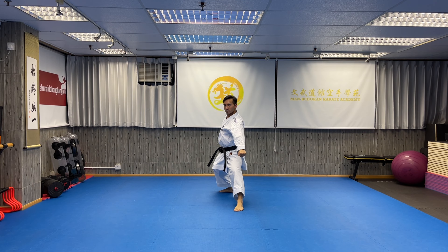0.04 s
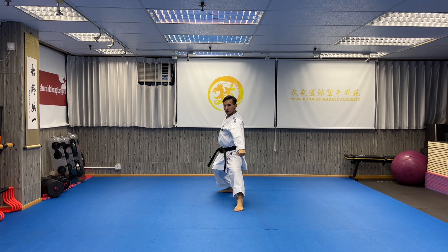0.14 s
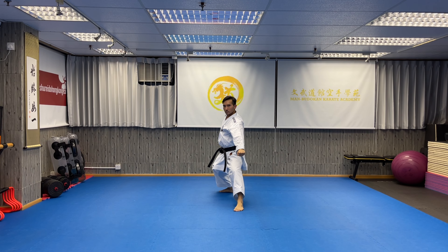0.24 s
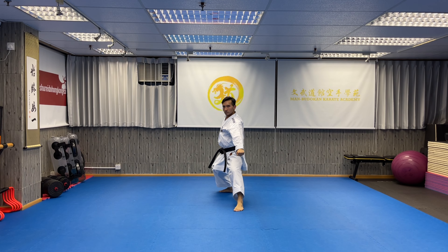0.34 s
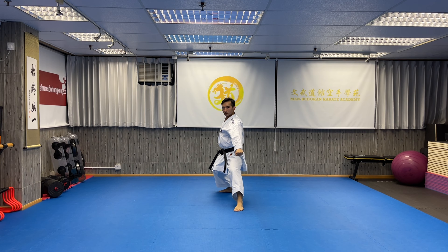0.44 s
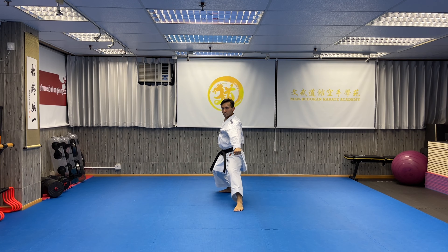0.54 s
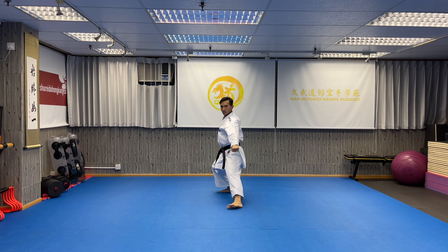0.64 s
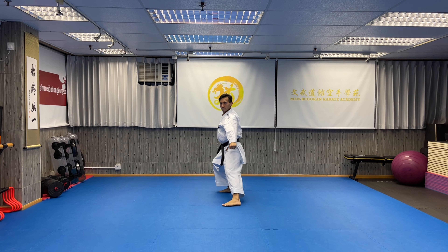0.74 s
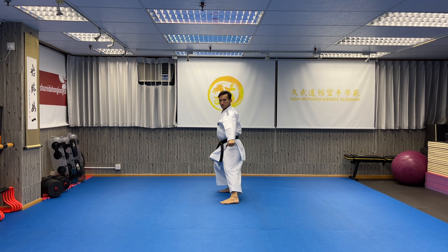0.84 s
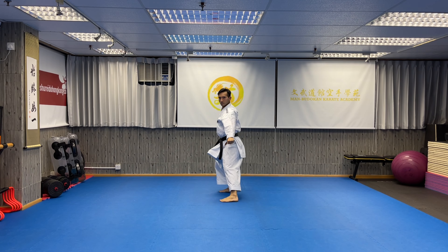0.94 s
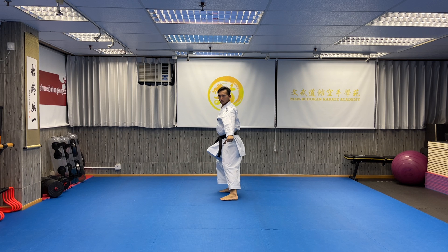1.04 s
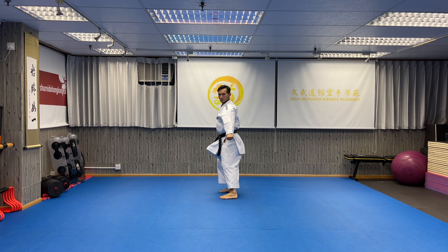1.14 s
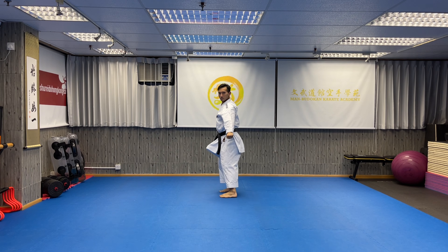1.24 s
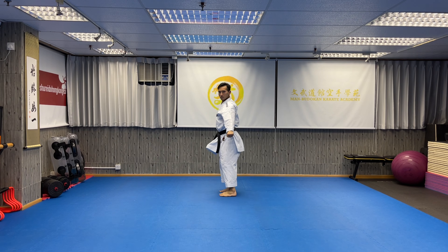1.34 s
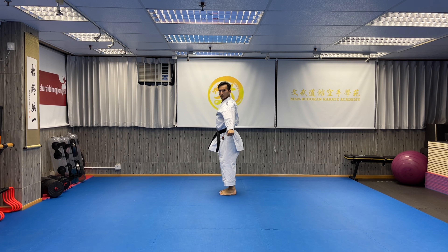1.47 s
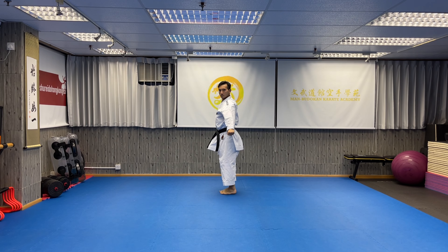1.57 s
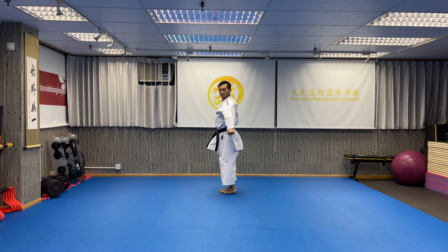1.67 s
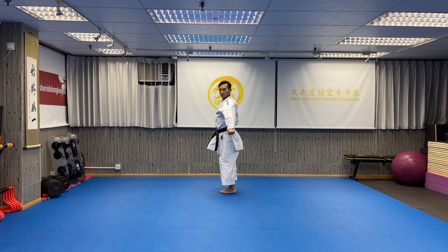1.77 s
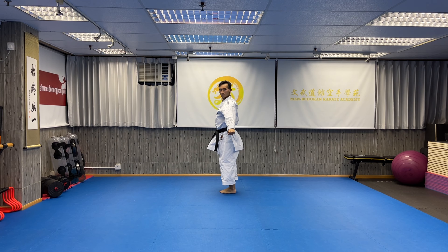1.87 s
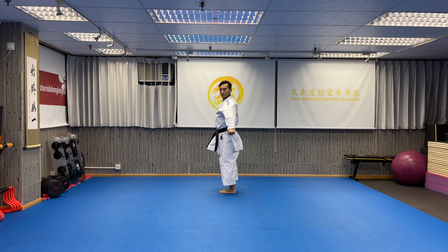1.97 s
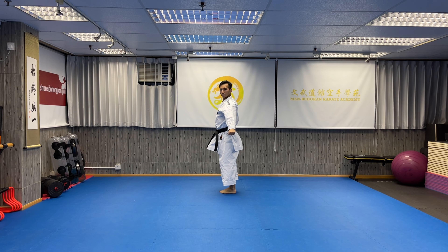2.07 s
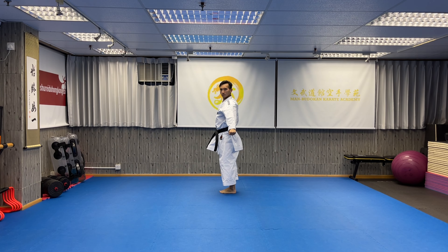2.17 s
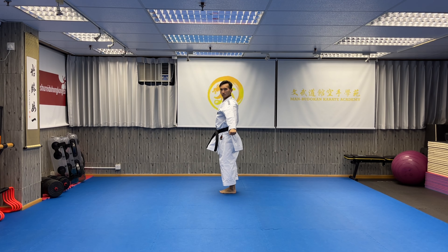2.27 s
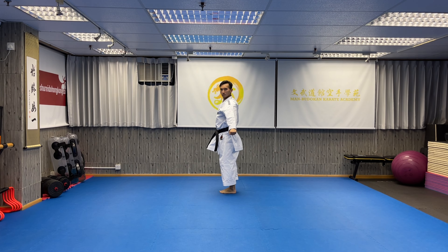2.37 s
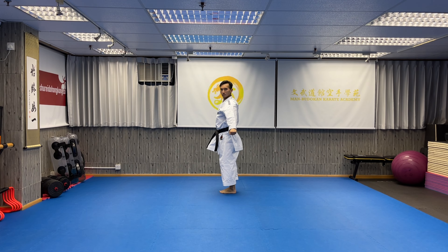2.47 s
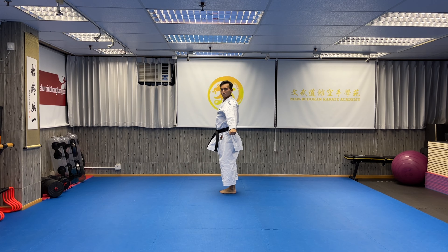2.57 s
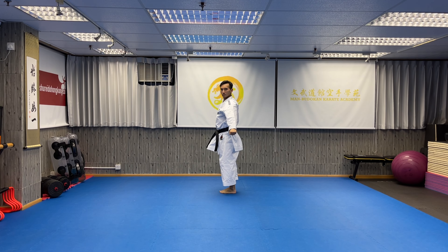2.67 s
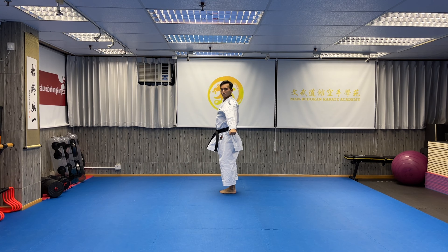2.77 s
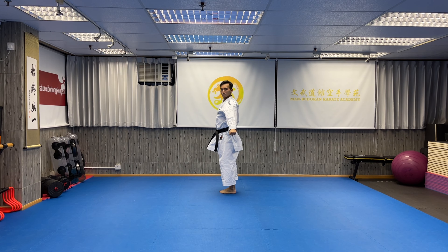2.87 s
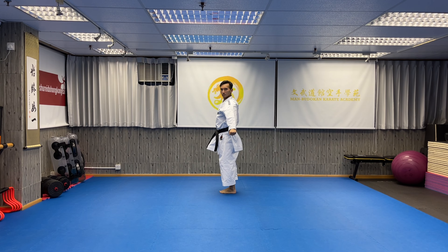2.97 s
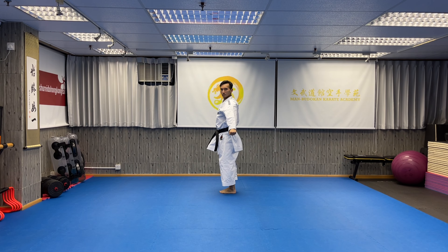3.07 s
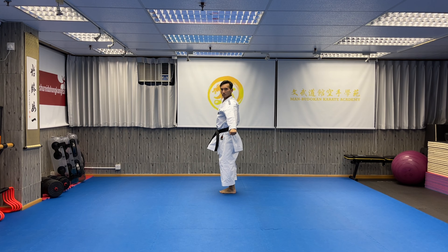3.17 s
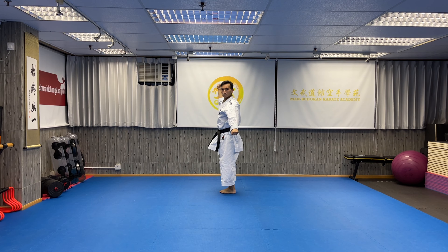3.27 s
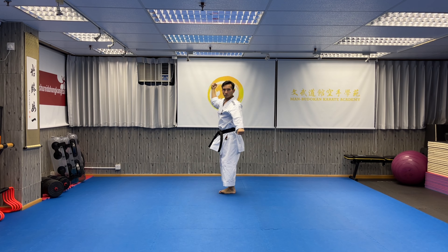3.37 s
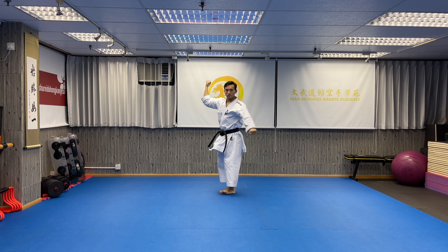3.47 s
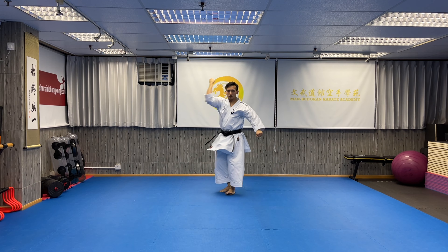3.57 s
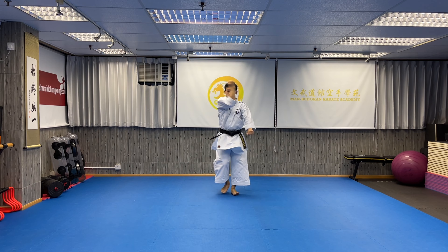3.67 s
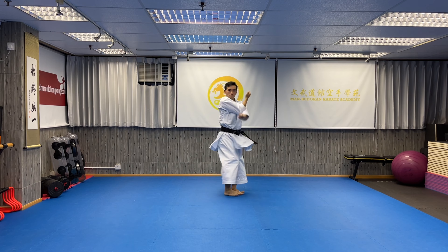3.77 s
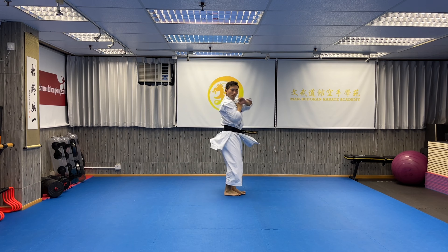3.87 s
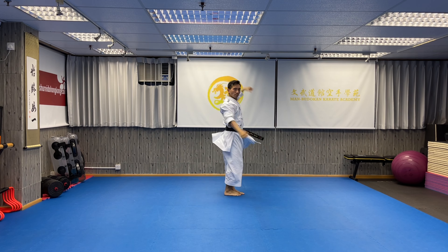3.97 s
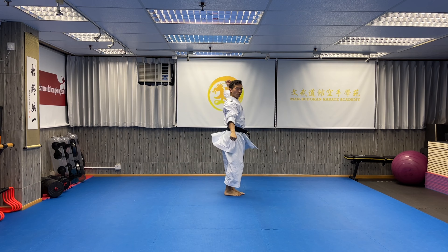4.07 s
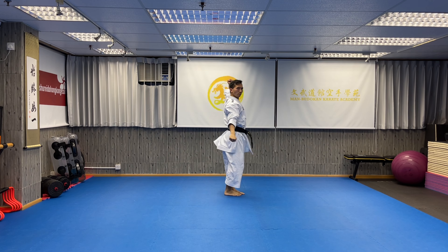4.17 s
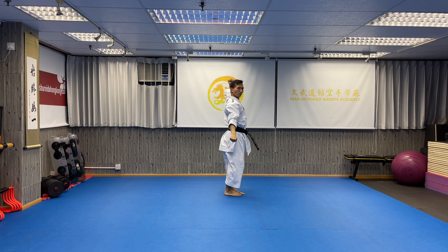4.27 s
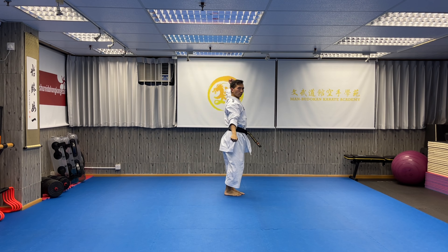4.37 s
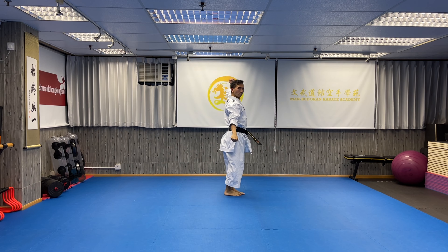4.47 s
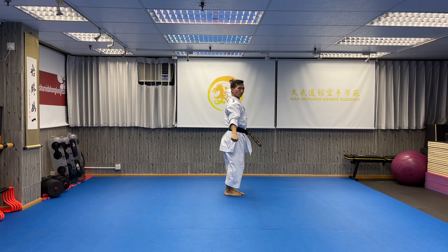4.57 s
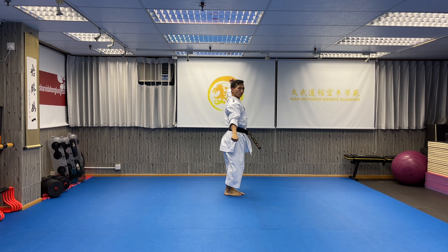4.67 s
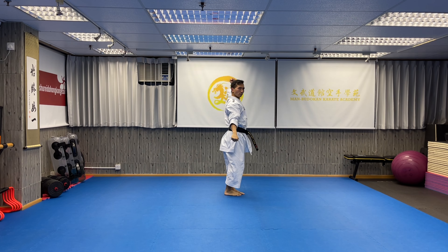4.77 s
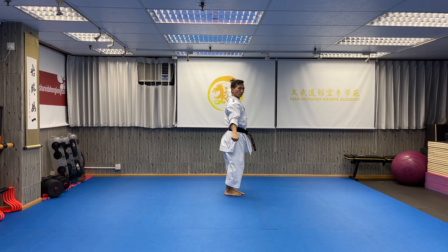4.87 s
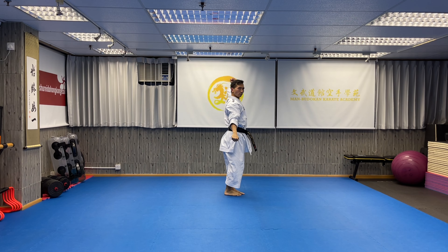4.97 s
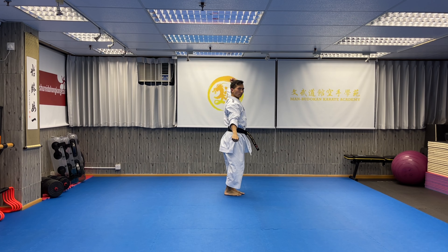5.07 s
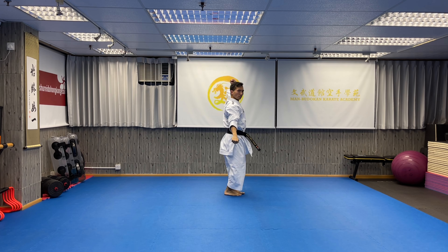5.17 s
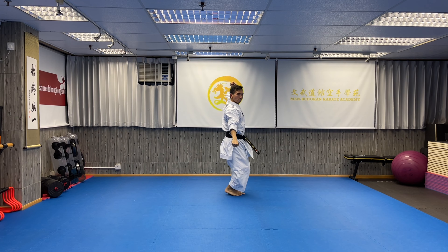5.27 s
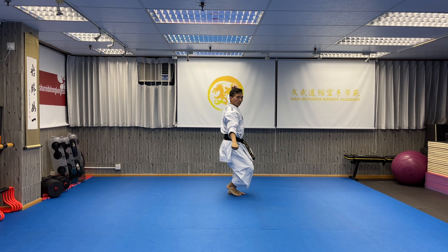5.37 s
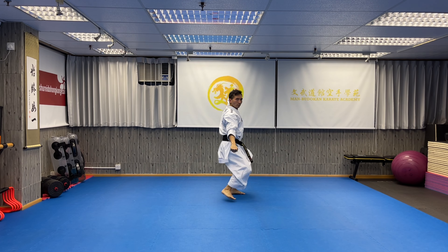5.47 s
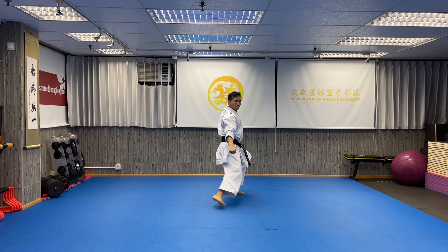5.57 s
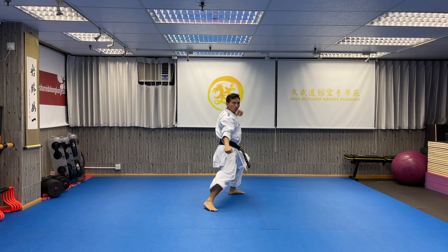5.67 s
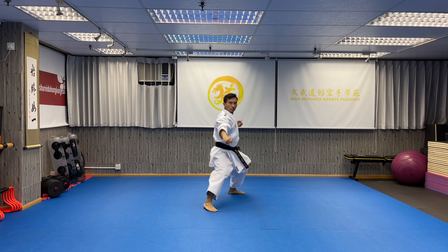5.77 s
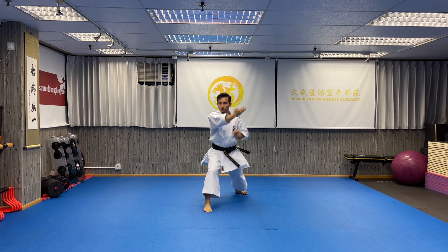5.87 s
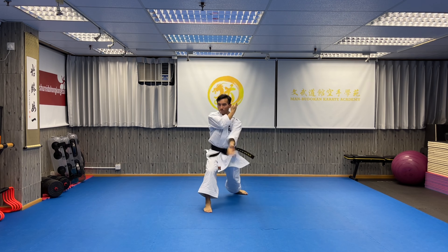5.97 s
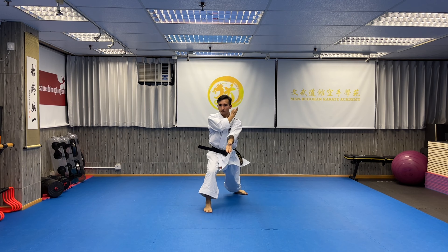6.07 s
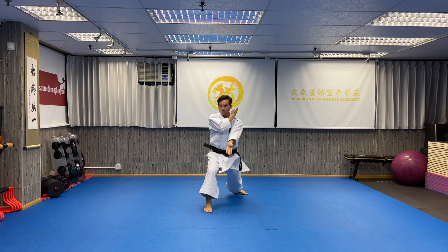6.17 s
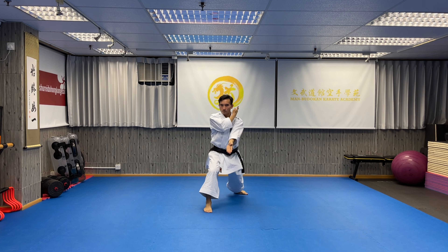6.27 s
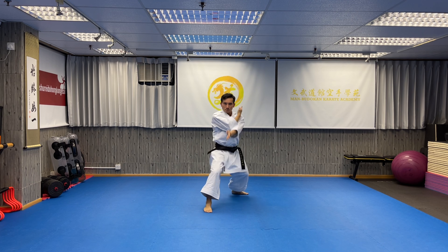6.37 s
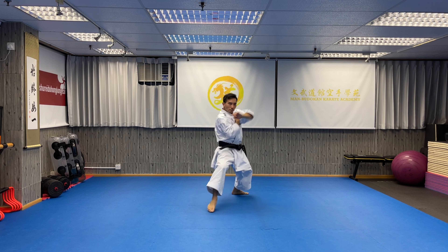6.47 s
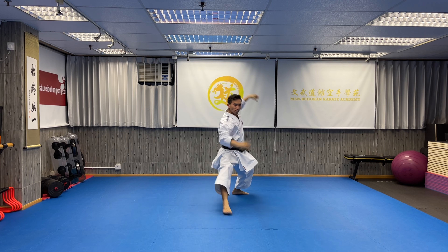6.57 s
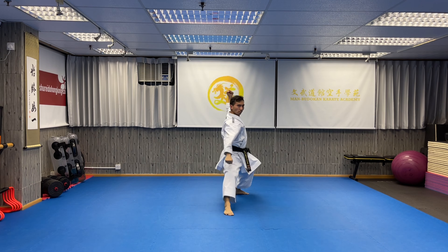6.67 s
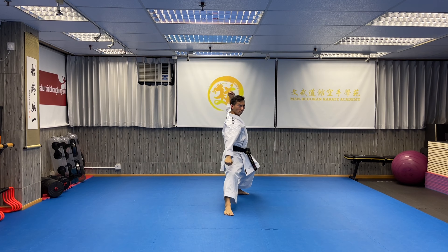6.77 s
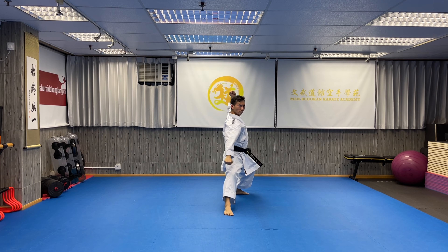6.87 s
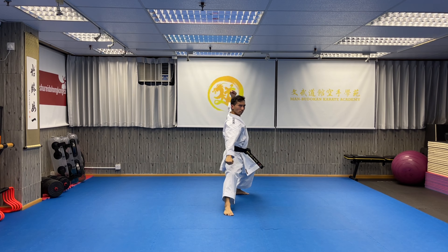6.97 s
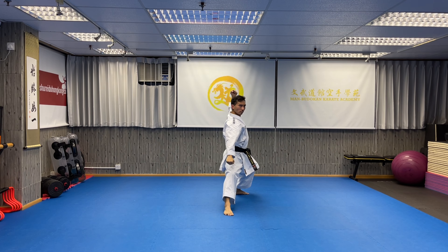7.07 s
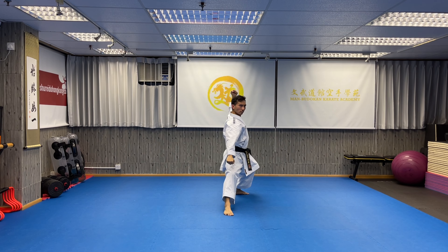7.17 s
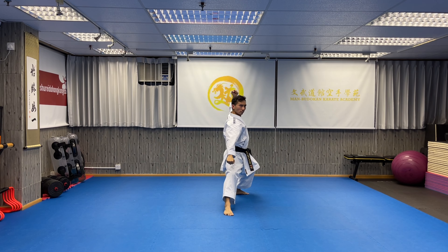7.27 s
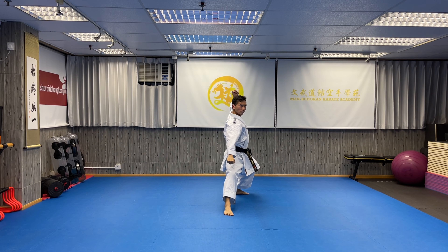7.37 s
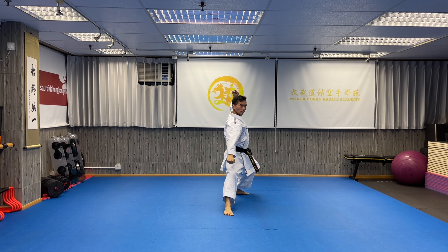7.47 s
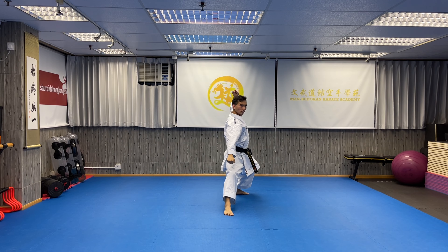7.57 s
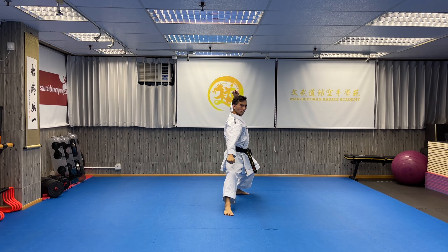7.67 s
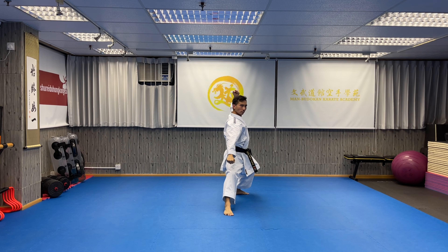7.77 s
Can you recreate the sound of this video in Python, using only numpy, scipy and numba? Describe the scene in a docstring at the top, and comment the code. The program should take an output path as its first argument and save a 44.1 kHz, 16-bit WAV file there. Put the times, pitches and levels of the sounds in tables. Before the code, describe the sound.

Low ventilation rumble in a training hall as a bare foot drags across a mat, then stiff cotton swishes, sharp cloth cracks and a hard stamp.

```python
"""A karate form on foam mats in a low training hall, heard from a few metres by a small stereo microphone pair.
Fan-driven ventilation rumbles throughout; a foot pivots with light thuds, then is drawn slowly over the mat,
as noise grains and a moving resonance. From about 3 s the heavy cotton uniform swishes and cracks with each
strike, as noise bursts and popping resonances, and the feet thud, as struck floor modes and short thumps.
A thin gliding squeak comes near 5 s, a hard stamp with a burst of cracks near 6.6 s, a last squeak near 7.4 s."""
import sys
import numpy as np
from scipy import signal
from scipy.fft import rfft, irfft, next_fast_len
from scipy.io import wavfile
from scipy.ndimage import uniform_filter1d
from numba import njit

SR = 44100
rng = np.random.default_rng(int(sys.argv[2]) if len(sys.argv) > 2 else 0)


def dump(signal):
    """Clip the signal to [-1, 1] and save it as 16-bit WAV at the path in sys.argv[1]."""
    limited = np.clip(np.atleast_2d(signal).T, -1, 1)
    pcm = np.round(limited * 32767).astype(np.int16)
    wavfile.write(sys.argv[1], SR, pcm)


N = 345301
TIME = np.arange(N) / SR


def from_db(db):
    """Logarithmic level: decibels to amplitude gain."""
    return 10 ** (np.asarray(db) / 20)


def rms_one(x):
    """Normalisation: scale to unit power."""
    return x / np.sqrt(np.mean(x ** 2) + 1e-20)


def at_hz(points, hz):
    """Logarithmic pitch: read a table on a log-frequency axis."""
    f, value = np.transpose(points)
    return np.interp(np.log(np.maximum(hz, 1)), np.log(f), value)


def add(track, s, sound):
    """Superposition: mix a short sound in at a time."""
    start = int(s * SR)
    track[start:start + len(sound)] += sound[:N - start]


def colour(x, spectrum):
    """Spectral shaping: a steady texture gets a spectrum that falls away past its ends; rms 1."""
    size = next_fast_len(N)
    hz = np.fft.rfftfreq(size, 1 / SR) + 1
    low_end = 1 / (1 + (spectrum[0][0] / hz) ** 4)
    high_end = 1 / (1 + (hz / spectrum[-1][0] / 2) ** 4)
    shaped = rfft(x, size) * from_db(at_hz(spectrum, hz)) * low_end * high_end
    return rms_one(irfft(shaped, size)[..., :N])


def flutter(per_s, size=N):
    """Random modulation: a wobble of rms 1 that takes new values per_s times a second."""
    knots = TIME[:size] * per_s
    return rms_one(np.interp(knots, np.arange(size), rng.standard_normal(size)))


def grains(spectrum, per_s, size_db, clump_db, clumps_per_s):
    """Shot noise: tiny slips and creases of uneven size, coming in clumps; rms 1."""
    born = rng.random(N) < per_s / SR
    uneven = size_db * np.minimum(rng.exponential(1, N), 4)
    sizes = from_db(uneven + clump_db * flutter(clumps_per_s))
    return colour(born * sizes * rng.choice([-1, 1], N), spectrum)


def resonate(x, hz, q):
    """Fixed resonance: a texture through one band-pass; rms 1."""
    return rms_one(signal.lfilter(*signal.iirpeak(hz, q, fs=SR), x))


@njit
def moving_resonance(x, step, q):
    """State-variable resonance: a band-pass whose centre (radians per sample) may change all the time."""
    out, low, band = np.zeros(len(x)), 0.0, 0.0
    for i in range(len(x)):
        low += step[i] * band
        band += step[i] * (x[i] - low - band / q)
        out[i] = band
    return out


# left-right likeness by frequency, nearly mono in the top treble: (f/Hz, correlation [-])
LIKENESS = [(60, 1), (130, 0.99), (270, 0.63), (600, 0.045), (1200, 0.16), (1600, 0.073), (2400, 0.52),
            (6000, 0.27), (8500, .9), (12000, 0.99)]


def stereo_noise(size):
    """Partial coherence: white noise on two channels, alike by frequency."""
    mid, side = rfft(rng.standard_normal((2, size)))
    alike = np.clip(at_hz(LIKENESS, np.fft.rfftfreq(size, 1 / SR)), -1, 1)
    common = np.sqrt(1 + alike) * mid
    opposed = np.sqrt(1 - alike) * side * [[1], [-1]]
    return irfft(common + opposed, size)


# reverberation of the hall: (f/Hz, t60/s)
HALL_T60 = [(100, 0.69), (300, 0.49), (1000, 0.5), (2500, 0.64), (6000, 0.53), (12000, 0.49)]


def hall(x, wet_db, first_echo_s=0.0034, early_db=4.5, early_s=0.023):
    """Reverberation: direct sound, strong early echoes off the low ceiling and near walls, a tail dying by band."""
    t = TIME[:SR // 2]
    noises, tail = [stereo_noise(size=len(t)), stereo_noise(size=len(t))], 0
    edges = np.geomspace(40, 18000, 10)   # bands of about an octave
    for k, (low, high) in enumerate(zip(edges, edges[1:])):
        band_pass = signal.butter(2, [low, high], "band", fs=SR, output="sos")
        band = signal.sosfilt(band_pass, noises[k % 2])
        tail = tail + band * from_db(-60 * t / at_hz(HALL_T60, np.sqrt(low * high)))
    onset = np.clip(t / first_echo_s - 1, 0, 1)
    tail = tail * onset * from_db(early_db * np.exp(-t / early_s))
    response = from_db(wet_db) * rms_one(tail) / np.sqrt(len(t))
    response[:, 0] += 1   # direct sound
    power = 1 + from_db(wet_db) ** 2
    return signal.oaconvolve(x[None], response, axes=1)[:, :N] / np.sqrt(power)


def narrow_noise(hz, width_hz):
    """Narrow-band noise: a tone that wavers in pitch and level; rms 1."""
    band = signal.butter(2, [hz - width_hz / 2, hz + width_hz / 2], "band", fs=SR, output="sos")
    return rms_one(signal.sosfilt(band, rng.standard_normal(N + SR))[SR:])   # drop the filter's start


# spectrum of the duct rumble: (f/Hz, density level/dB, relative)
DUCT_COLOUR = [(30, -14.5), (45, -2.5), (62, -7), (90, -6), (140, -10.5), (200, -13), (370, -20),
               (520, -27), (800, -33.5), (1200, -35.5), (1650, -44.5), (2700, -52), (4400, -65.5),
               (12000, -68.5)]
# when the faint whine is heard: (from t/s, to t/s)
WHINE_SPANS = [(0, 0.58), (2.38, 3.25)]
WHINE_HZ, WHINE_WAVER_HZ, WHINE_DB, WHINE_SWAY_DB = 2850, 17.6, -75, 2.5
FAN_HZ, FAN_WIDTH_HZ, FAN_DB = 49.92, 3.7, -37.5


def ventilation(air_db=-34.0):
    """Broadband flow noise: duct rumble, with a narrow-band fan drone and a faint frequency-modulated whine."""
    air = from_db(air_db) * colour(stereo_noise(size=next_fast_len(N))[:, :N], DUCT_COLOUR)
    drone = from_db(FAN_DB) * narrow_noise(FAN_HZ, FAN_WIDTH_HZ)
    whine_hz = WHINE_HZ + WHINE_WAVER_HZ * flutter(per_s=60)
    whine = np.sqrt(2) * np.sin(2 * np.pi * np.cumsum(whine_hz) / SR)
    heard = sum(1.0 * ((TIME >= a) & (TIME < b)) for a, b in WHINE_SPANS)
    heard = uniform_filter1d(heard, size=SR // 6)   # soft ends
    whine_gain = from_db(WHINE_DB + WHINE_SWAY_DB * flutter(per_s=9.2))
    return air + drone + whine_gain * heard * whine


# faint squeaks as a stance settles: (start t/s, length t/s, level/dB, starting f/Hz)
SQUEAKS = [(4.93, 0.045, -76, 7800), (7.445, 0.06, -75, 5380)]
SQUEAK_SAG_HZ_PER_S = 3000


def squeaks(waver=0.004):
    """Frequency glide: thin tones swell, sag in pitch and stop."""
    out = np.zeros(N)
    for s, length, level, hz in SQUEAKS:
        t = TIME[:int(length * SR)]
        pitch = (hz - SQUEAK_SAG_HZ_PER_S * t) * np.exp(waver * flutter(per_s=300, size=len(t)))
        tone = np.sin(2 * np.pi * np.cumsum(pitch) / SR)
        add(out, s, 2 * from_db(level) * np.sin(np.pi * t / length) * tone)   # 2 brings the rms to level
    return out


SLOWING = 1.4   # exponent; above 1, the foot loses most of its speed late in the slide
SLIDE_STOP_S = 0.09


def glide(start, length, attack_s):
    """Kinematics: a slide gets going, holds and stops; its gain, and how far the foot has slowed."""
    t = np.maximum(TIME - start, 0)
    stopping = np.exp(-np.maximum(t - length, 0) / SLIDE_STOP_S)
    return np.minimum(t / attack_s, 1) * stopping, np.minimum(t, length) ** SLOWING


# a pivot, then the long draw: (start t/s, length t/s, hiss level/dB, dull rub level/dB, time to get going t/s)
SLIDES = [(0.461, 0.14, -55, -48.5, 0.078), (0.678, 0.95, -36, -44.5, 0.027)]
# spectra of the sole on the mat: (f/Hz, density level/dB, relative)
SOLE_HISS = [(1200, -5), (3000, -13.5), (4500, -6.5), (6000, -2.5), (7200, -5), (9000, 0), (11000, 2),
             (13000, -6.5)]
SOLE_RUB = [(200, 3), (400, 1.5), (700, 0), (1200, 3), (1600, -2), (2050, -3), (2900, -8.5), (5000, -13)]
HISS_SAG_DB, RUB_SAG_DB = 17, 7.5   # dB per unit of slowing: both fade as the foot slows


def sliding_foot():
    """Stick-slip friction: skin catches on the fine grain of the mat thousands of times a second."""
    hiss = grains(SOLE_HISS, per_s=16000, size_db=3.0, clump_db=2.0, clumps_per_s=180)
    scrape = grains(SOLE_RUB, per_s=7000, size_db=1.0, clump_db=1.5, clumps_per_s=40)
    out = 0
    for start, length, hiss_db, rub_db, attack in SLIDES:
        gain, slowed = glide(start, length, attack)
        fading_hiss = hiss * from_db(hiss_db - HISS_SAG_DB * slowed)
        fading_rub = scrape * from_db(rub_db - RUB_SAG_DB * slowed)
        out = out + gain * (fading_hiss + fading_rub)
    return out


# rasp of the long draw, its pitch rising and then falling: (t/s, level/dB, mean f/Hz)
DRAW = [(0.68, -78, 2050), (0.705, -42.5, 2000), (0.79, -43, 2210), (0.86, -43.5, 2660), (0.94, -45, 2800),
        (1.02, -42.5, 2540), (1.12, -49, 2300), (1.3, -52.5, 2200), (1.42, -69, 2150), (1.64, -58, 2200),
        (1.74, -85, 2200)]


def sole_rasp(q=2.2, judder_db=1.0, waver=0.13):
    """Friction exciting a moving resonance: the drawn sole judders, and its rasp wavers in pitch."""
    s, level, pitch = np.transpose(DRAW)
    hz = np.interp(TIME, s, pitch) * np.exp(waver * flutter(per_s=36))
    catches = grains([(1500, 0), (4000, 0)], per_s=8000, size_db=1.0, clump_db=-1.0, clumps_per_s=330)
    rasp = rms_one(moving_resonance(catches, 2 * np.pi * hz / SR, q))
    level_db = np.interp(TIME, s, level, left=-np.inf, right=-np.inf)   # silent outside the draw
    return rasp * from_db(level_db + judder_db * flutter(per_s=23))


def ring(hz, t60):
    """Modal decay: a struck mode of height 1."""
    t = TIME[:SR // 2]
    return from_db(-60 * t / t60) * np.sin(2 * np.pi * hz * t)


# feet landing, weight shifting, trouser legs billowing: (t/s, level/dB before trims, settled thump f/Hz, contact t/s)
STEPS = [(0.533, -17.5, 119.4, 0.0044), (0.573, -24.5, 306, 0.0033), (0.712, -20.5, 240, 0.0039),
         (3.455, -18.5, 55, 0.0068), (3.645, -17.5, 143, 0.0035), (3.782, -11.5, 199, 0.0049),
         (3.812, -13.5, 65, 0.0086), (3.851, -16.5, 133, 0.0067), (5.623, -15.5, 188, 0.003),
         (5.777, -14.5, 207, 0.0029), (5.849, -17, 199, 0.0041), (5.888, -14.5, 90, 0.0039),
         (6.581, -0.5, 299, 0.0015), (6.586, -6, 137, 0.0095), (6.599, -10.5, 343, 0.0034),
         (6.617, -15, 428, .0015), (6.633, -16, 261, 0.0036), (6.658, -10, 124, 0.0063),
         (6.711, -19, 118, .006)]
# the mat-covered floor and the low hall resonances it drives: (f/Hz, level/dB, t60/s)
FLOOR_MODES = [(73.5, -24, 0.27), (114.7, -13.5, 0.29), (144.3, -6, 0.11), (233.5, -5.5, 0.1),
               (279, -17, 0.071), (301.4, -10, .13), (334.5, -5, 0.18), (388.4, -5.5, 0.15),
               (436, -11, 0.25), (478, -17.5, 0.22), (680, -20, 0.26)]


def thuds(floor_trim_db=-1.5, thump_trim_db=5.5, thump_t60=0.052, build_s=0.0047,
          uneven_db=2.0, slack_share=0.15, squeeze_s=0.0071):
    """Impact excitation: the thump rises in pitch as foam is squeezed; briefer contact rings higher floor modes."""
    modes = [(-1) ** k * from_db(db) * ring(hz, t60) for k, (hz, db, t60) in enumerate(FLOOR_MODES)]
    t = TIME[:len(modes[0])]
    out, build = np.zeros(N), 1 - np.exp(-t / build_s)
    tension = 1 - slack_share * np.exp(-t / squeeze_s)
    for s, level, hz, contact in STEPS:
        push = np.hanning(max(int(contact * SR), 3))
        # each mode dies unevenly
        floor = sum(mode * from_db(uneven_db * flutter(per_s=50, size=len(t))) for mode in modes)
        struck_floor = np.convolve(build * floor, push / push.sum())
        add(out, s - contact / 2, from_db(level + floor_trim_db) * struck_floor)
        thump = from_db(-60 * t / thump_t60) * np.sin(2 * np.pi * hz * np.cumsum(tension) / SR)
        add(out, s, from_db(level + thump_trim_db) * build * thump)
    return out


BRAKE_S = 0.025   # one braking time for every limb
SWING_ROUNDNESS = 0.93   # exponent; 1 gives a pointed swell, 2 a bell


def swell(t, wind_up_s):
    """Kinematics: a limb gathers speed up to t = 0, then brakes; height 1."""
    away = np.maximum(-t / wind_up_s, t / BRAKE_S)
    return np.exp(-np.minimum(away, 20) ** SWING_ROUNDNESS)


# a limb swings and the uniform follows; arms open, cross and block (from 3.2 s), step out and low block (5.3 s),
# turn and strike (6.2 s): (top speed t/s, rubbing level/dB, flapping level/dB, wind-up t/s, fold f/Hz)
SWINGS = [ (0.531, -65, -44, 0.03, 450), (0.63, -56, -46, 0.03, 400), (0.712, -52, -39, 0.018, 480),
          (3.29, -55.5, -40, 0.016, 990), (3.335, -46.5, -46.5, 0.022, 1070),
          (3.53, -50.5, -47.5, 0.033, 900), (3.58, -55, -44.5, 0.026, 520), (3.638, -47, -35.5, 0.067, 453),
          (3.71, -54, -35, 0.02, 650), (3.80, -34, -31, 0.04, 464), (3.868, -39.5, -35.5, 0.026, 755),
          (3.915, -52, -35, 0.036, 675), (4.008, -47, -32.5, 0.023, 880), (4.05, -60, -53, 0.016, 800),
          (4.21, -60.5, -50, 0.066, 1000), (4.72, -69.5, -64, .05, 1000), (5.31, -57.5, -52, 0.11, 1090),
          (5.385, -42.5, -51, 0.03, 1090), (5.625, -47, -34, 0.1, 400), (5.793, -34.5, -32, 0.03, 520),
          (5.871, -39.5, -29, 0.075, 650), (5.925, -45, -27.5, 0.021, 630),
          (5.98, -40.5, -29.5, 0.022, 470), (6.21, -63.5, -64, 0.037, 1100),
          (6.368, -42.5, -39.5, 0.032, 1250), (6.42, -31, -35, 0.021, 1190), (6.465, -47, -37, 0.061, 520),
          (6.515, -46, -32.5, 0.033, 613), (6.565, -41, -37, 0.017, 600)]
# spectra of the cloth: (f/Hz, density level/dB, relative)
CLOTH_RUB = [(1200, 0.5), (2800, -0.5), (4000, -2.5), (5200, -2.5), (7000, -4), (9000, -0.5), (11000, 0),
             (13000, -17)]
CLOTH_FLAP = [(70, -9), (180, 10), (300, 6), (480, 5), (850, -3), (1250, -1), (1600, -9.5), (2000, -7),
              (2700, -18.5), (5000, -23.5)]


def swishes(fold_db=-5.5, fold_q=2.2):
    """Friction and flow noise: sleeves brush the jacket while loose folds flap in the air."""
    rub = grains(CLOTH_RUB, per_s=9000, size_db=2.5, clump_db=2.0, clumps_per_s=260)
    flap = grains(CLOTH_FLAP, per_s=2500, size_db=1.5, clump_db=2.3, clumps_per_s=150)
    out = np.zeros(N)
    for s, rubbing, flapping, wind_up, hz in SWINGS:
        if s < 1:
            continue   # a swing needs a full second before it; earlier rows are silent
        now = slice(int((s - 1) * SR), int((s + .5) * SR))
        fold = rms_one(flap[now] + from_db(fold_db) * resonate(flap[now], hz, fold_q))
        cloth = rub[now] * from_db(rubbing) + fold * from_db(flapping)
        out[now] += swell(TIME[now] - s, wind_up) * cloth
    return out


# cloth pulled taut or skin slapping the mat, levels before trims:
# (t/s, crack level/dB, treble edge level/dB, t60/s, mean pop f/Hz, pop level/dB)
SNAPS = [(0.564, -38, -44.5, 0.028, 2150, -33.5), (0.7, -31, -39, 0.038, 1980, -30.5),
         (3.288, -48, -58, 0.064, 1030, -41), (3.643, -46, -59, 0.048, 850, -29.5),
         (3.758, -22.5, -36.5, 0.055, 1310, -30), (3.781, -23.5, -41, 0.081, 720, -34),
         (3.808, -22.5, -38, 0.057, 1360, -29), (3.925, -31, -56, .08, 1150, -31.5),
         (3.992, -25, -52, 0.053, 1280, -30.5), (3.999, -25, -39, 0.043, 2600, -32),
         (4.018, -31.5, -63, 0.049, 1100, -25.5), (4.544, -36.5, -60, 0.055, 1500, -61),
         (5.055, -44, -50, 0.044, 1500, -54), (5.386, -42, -37, 0.036, 2400, -53),
         (5.612, -30, -56, 0.072, 2350, -35), (5.763, -26, -41, 0.096, 1040, -25),
         (5.845, -22, -45, 0.071, 1350, -22), (5.899, -22.5, -50, 0.057, 1190, -28.5),
         (5.96, -20.5, -38, 0.028, 1870, -18), (6.413, -28.5, -34.5, .09, 1260, -35),
         (6.484, -31.5, -56, 0.12, 1140, -27.5), (6.520, -36, -56, 0.08, 840, -26.5),
         (6.578, -23, -30, 0.023, 2200, -23), (6.581, -12, -17.5, 0.032, 2500, -15),
         (6.595, -13.5, -30.5, 0.065, 1780, -21.5), (6.620, -18, -45, .1, 1040, -26.5)]
# spectrum of the bright edge of a crack: (f/Hz, density level/dB, relative)
CRACK_EDGE = [(1200, 3), (2600, 3.5), (3800, -8), (5200, 0), (5950, 3.5), (6800, -1.5), (8500, -0.5),
              (11000, 5), (13000, -5)]
TAUT_FADE_S, WHIP_FADE_S = 0.016, 0.014   # t60 that would earn a full whip crack; t60 of that crack


def pops(pop_trim_db=-2.5, pop_q=10.0, waver=0.096, rise_s=0.0021, whip_trim_db=2.5):
    """Cavity resonance: trapped air pops at an unsteady pitch; the faster a snap fades, the more whip crack."""
    out, t = np.zeros(N), TIME[:SR // 8]
    crackle = grains(CRACK_EDGE, per_s=3500, size_db=1.0, clump_db=2.5, clumps_per_s=900)
    wobble = np.exp(waver * flutter(per_s=120))
    for s, _, treble, fade, hz, level in SNAPS:
        now = slice(int(s * SR), int(s * SR) + len(t))
        noise = rng.choice([-1., 1.], len(t))
        air = rms_one(moving_resonance(noise, 2 * np.pi * hz * wobble[now] / SR, pop_q))
        pop = air * np.minimum(t / rise_s, 1) * from_db(level + pop_trim_db - 60 * t / fade)
        whip = crackle[now] * from_db(treble + whip_trim_db - 60 * t / WHIP_FADE_S)
        add(out, s, pop + whip * min(TAUT_FADE_S / fade, 1) ** 2)
    return out


# spectrum of the body of a crack: (f/Hz, density level/dB, relative)
CRACK_BODY = [(200, 13), (600, 2), (1200, 1.5), (1600, -3.5), (2100, -2.5), (3000, -11.5), (6000, -18.5)]


def snaps(body_trim_db=-1.5, edge_trim_db=4.5, rise_share=.055):
    """Impulsive noise: each snap is a quick run of cracks with a dull body and a bright edge."""
    body = grains(CRACK_BODY, per_s=7000, size_db=-0.5, clump_db=7.0, clumps_per_s=400)
    edge = grains(CRACK_EDGE, per_s=22000, size_db=-3.0, clump_db=0.5, clumps_per_s=400)
    out, t = np.zeros(N), TIME[:SR // 8]
    for s, level, treble, fade, _, _ in SNAPS:
        now = slice(int(s * SR), int(s * SR) + len(t))
        rise = rise_share * fade   # slack cloth both starts and fades more slowly
        shape = np.minimum(t / rise, 1) * from_db(-60 * t / fade)
        dull = rms_one(body[now]) * from_db(level + body_trim_db)
        bright = edge[now] * from_db(treble + edge_trim_db)
        add(out, s - rise / 2, shape * (dull + bright))
    return out


def snapping_folds(wet_db=1.5, count=3):
    """Incoherent sum: several folds crack together, each reaching the hall by different paths."""
    return sum(hall(snaps(), wet_db) for fold in range(count)) / np.sqrt(count)


def scene():
    """Superposition: air, feet and uniform add up, the feet and cloth with several sets of hall echoes."""
    background = ventilation() + hall(squeaks(), wet_db=-8.0)
    feet = hall(sliding_foot() + sole_rasp(), wet_db=0.0) + hall(thuds(), wet_db=-5.0)
    uniform = hall(swishes(), wet_db=0.5) + hall(pops(), wet_db=-5.0) + snapping_folds()
    return background + feet + uniform


# the left microphone port against the right one: (f/Hz, level/dB) and (f/Hz, phase lead/rad)
PORT_BALANCE = [(60, 0.2), (300, 1), (1200, 1), (2200, 1.5), (4000, 2.5), (6800, 4), (8500, 0)]
PORT_PHASE = [(2000, 0.13), (2900, 0.71), (6700, 0.48), (7600, 1), (8700, 0), (10250, -np.pi),
              (11800, -2 * np.pi)]


def ports(x, ring_hz=11200, ring_q=14.0, ring_gain=0.42):
    """Port resonance: both ports ring in the treble; the left is a little brighter and turns a cycle in phase."""
    left, right = x + ring_gain * signal.lfilter(*signal.iirpeak(ring_hz, ring_q, fs=SR), x)
    size = next_fast_len(N + SR // 10)
    hz = np.fft.rfftfreq(size, 1 / SR)
    lean = from_db(at_hz(PORT_BALANCE, hz) / 2)   # half up on the left, half down on the right
    turn = np.exp(1j * at_hz(PORT_PHASE, hz))
    spectra = [rfft(left, size) * lean * turn, rfft(right, size) / lean]
    return irfft(np.array(spectra), size)[:, :N]


def gain_control(x, threshold_db=-4.5, slope=0.44, sink_db_per_s=0.16, attack_s=0.045):
    """Compression: a loud peak turns the gain down for good, and the gain also sinks slowly throughout."""
    peak_db = 20 * np.log10(np.abs(x).max(axis=0) + 1e-9)
    over = np.maximum(peak_db - threshold_db, 0) * slope
    held = np.maximum.accumulate(over - sink_db_per_s * TIME) + sink_db_per_s * TIME
    pole = np.exp(-1 / (attack_s * SR))
    return x * from_db(-signal.lfilter([1 - pole], [1, -pole], held))


def record(dry):
    """Transduction: port colour, gain control, clipping at full scale and a steep low-pass."""
    x = np.clip(gain_control(ports(dry)), -1, 1)
    top_cut = signal.cheby2(14, 60, 13500, fs=SR, output="sos")   # 60 dB down from 13500 Hz up
    return signal.sosfilt(top_cut, x)


dry = scene()
out = record(dry)
dump(out)
```